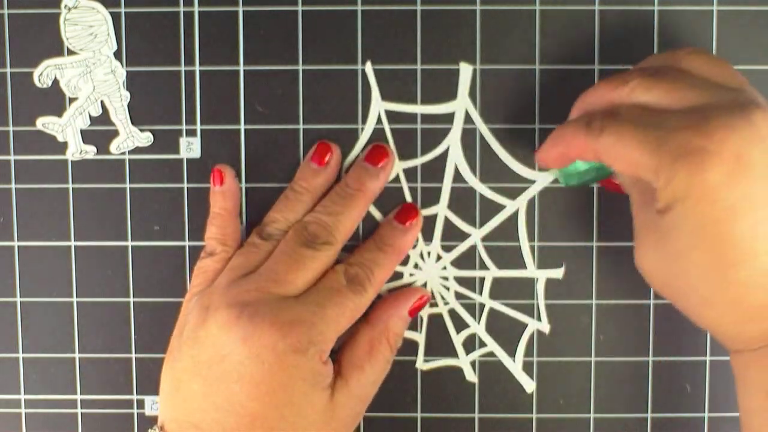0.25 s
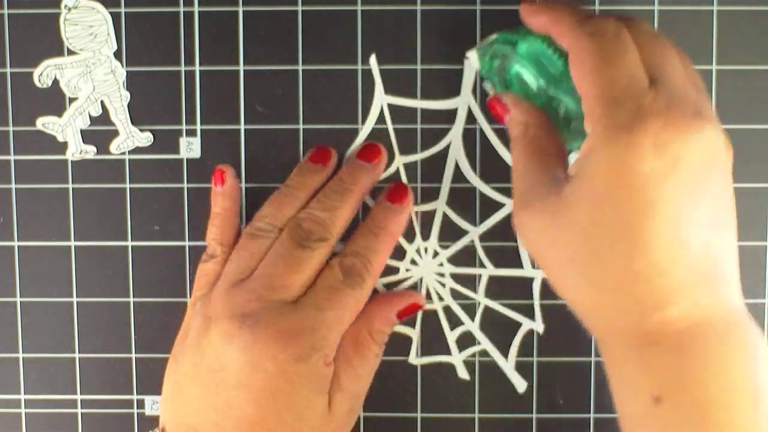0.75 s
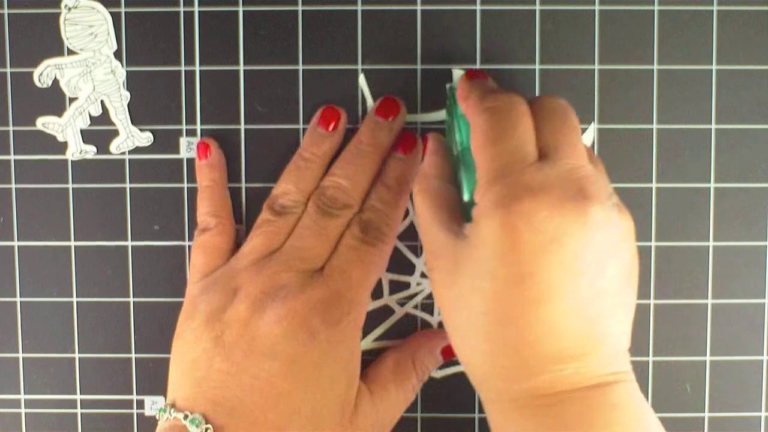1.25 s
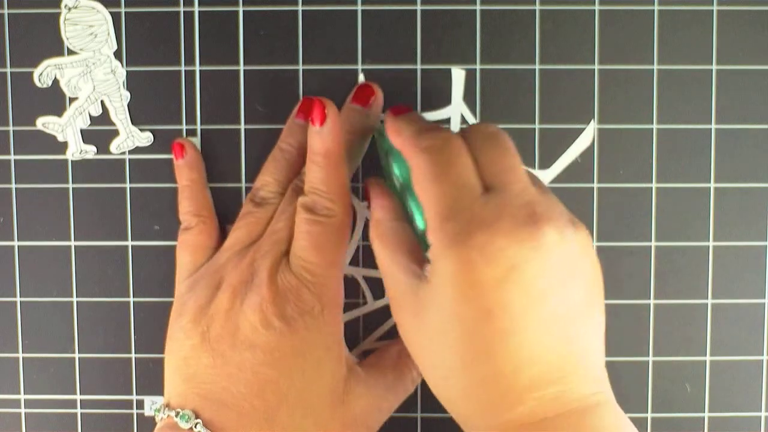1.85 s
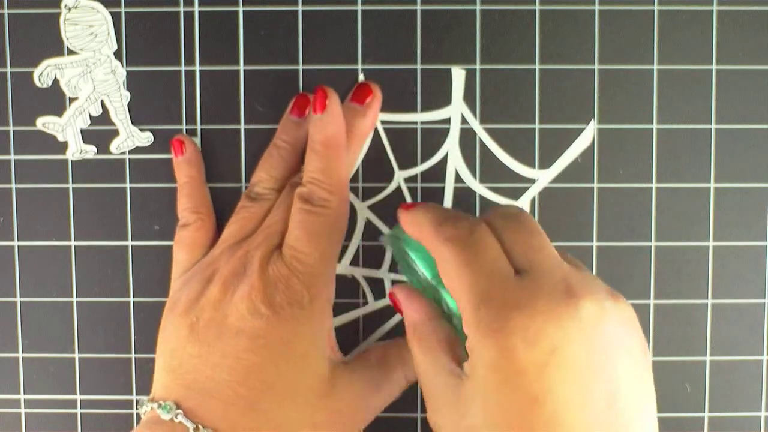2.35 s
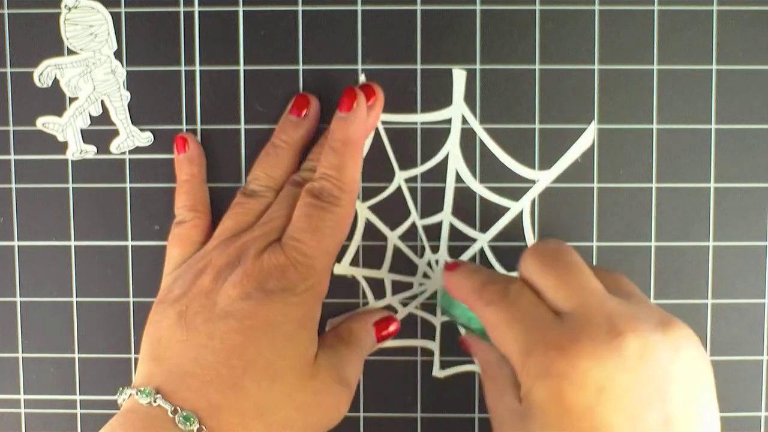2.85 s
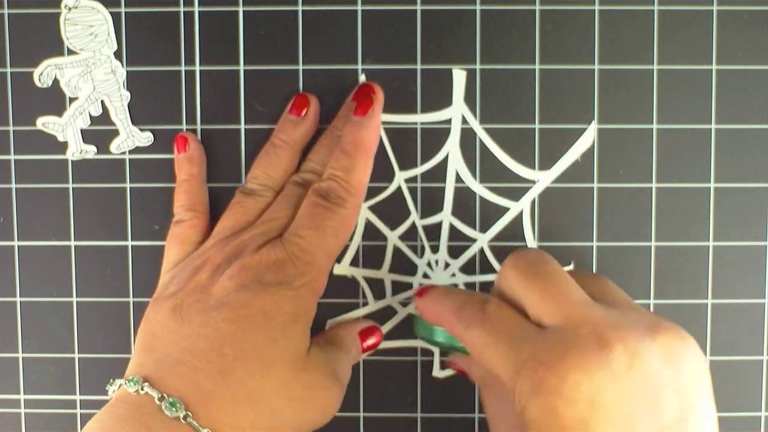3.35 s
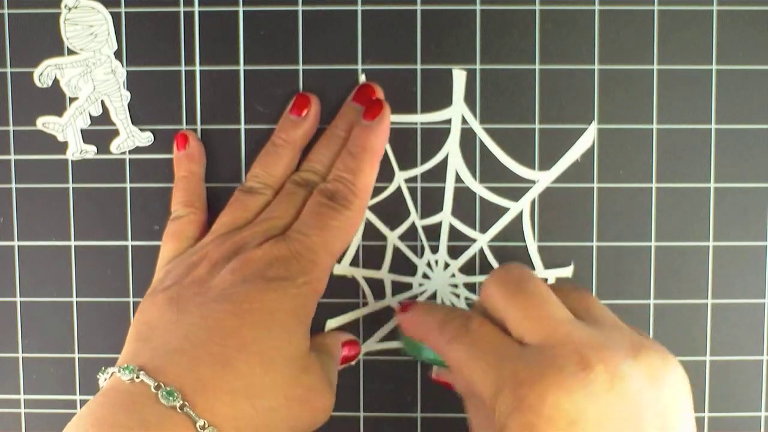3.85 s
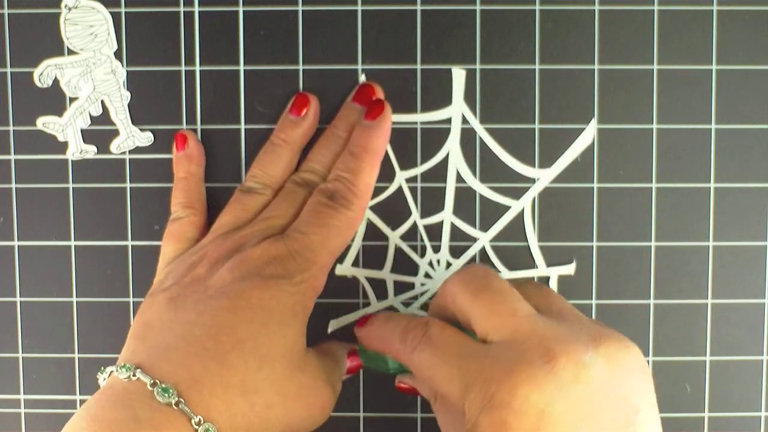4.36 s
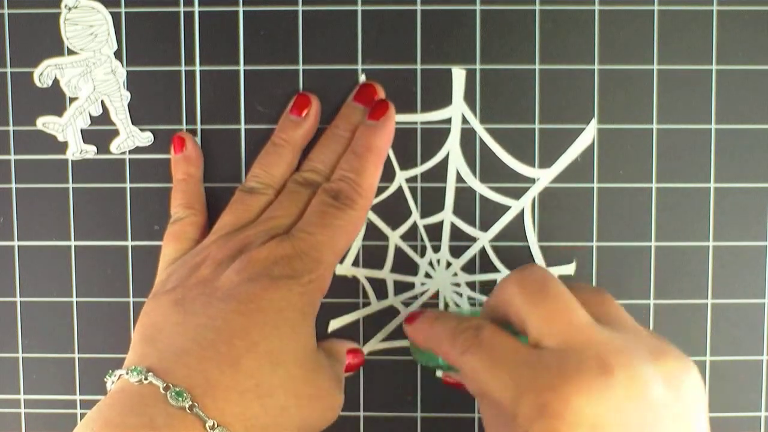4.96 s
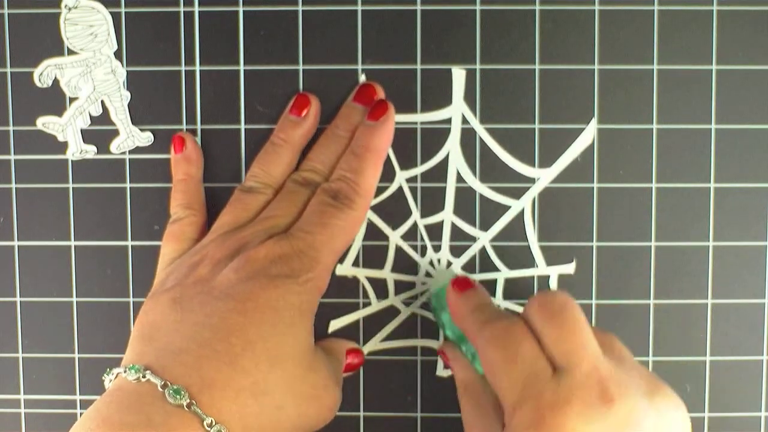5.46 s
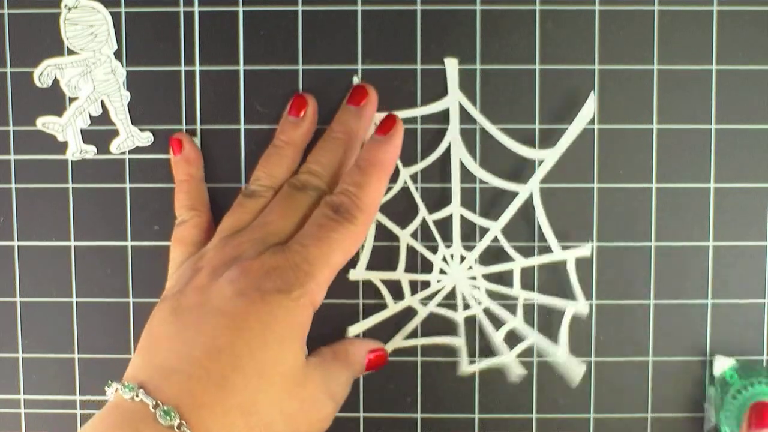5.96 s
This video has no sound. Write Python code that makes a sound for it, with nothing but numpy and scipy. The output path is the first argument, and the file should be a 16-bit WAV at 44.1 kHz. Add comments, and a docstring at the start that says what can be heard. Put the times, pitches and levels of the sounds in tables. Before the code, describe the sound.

Short dry rasps and bright plastic ratchet clicks from a tape runner pulled over a paper cut-out, with small table knocks and faint growing hiss.

```python
"""Short rasping strokes are heard first: a plastic tape runner is drawn over a paper cut-out on a craft mat.
Gear-pulsed noise, the crackle of peeling tape, excites resonances of case, hub and spools; a ratchet clicks.
Knocks are damped table modes, snaps and ticks are decaying noise bursts, and brushing is uneven filtered noise.
At the end the runner is set down and slid aside. A faint hiss lies behind and grows louder halfway through."""
import sys
import numpy as np
from scipy import signal
from scipy.fft import rfft, irfft
from scipy.io import wavfile
from scipy.ndimage import uniform_filter1d, map_coordinates

SR = 44100
rng = np.random.default_rng(int(sys.argv[2]) if len(sys.argv) > 2 else 0)


def wav_record(signal):
    """Record a signal, one row per channel, as 16-bit PCM in the file named by sys.argv[1]."""
    frames = np.transpose(np.atleast_2d(signal))
    bounded = np.clip(frames, -1, 1)
    # unit amplitude maps onto the largest positive 16-bit level
    quanta = np.round(bounded * 32767).astype(np.int16)
    wavfile.write(sys.argv[1], SR, quanta)


N = 273861
T = np.arange(N) / SR  # time in s

# background hiss over time: time_s, level_db
HISS_LEVEL = [(0, -66.5), (.5, -70.5), (2.55, -68), (2.9, -60), (3.1, -59), (3.35, -55), (4.9, -53.5),
              (6.21, -53)]
# spectrum of the hiss: frequency_hz, gain_db
HISS_SPECTRUM = [(30, -45), (80, -16), (150, -14), (220, -7.5), (400, -3.5), (750, 3), (1350, -0.5),
                 (2000, -3), (4200, -8.5), (8700, -11), (9600, -13), (10400, -29.5), (13000, -72)]
# slow swells of the recorder's zero line, too deep to hear: start_s, relative_peak_db
ZERO_LINE_SWELLS = [(.512, -42.5), (1.153, -41.5), (1.954, -41)]
# fingers and case brushing over paper and mat:
# start_s, length_s, relative_level_db, swell_from_start_to_crest_db, crest_as_share_of_length
BRUSHES = [(0.72, 0.11, -66.5, 9, 0.92), (1.092, 0.29, -70, -3, 0.38), (1.73, 0.016, -66.5, 11, 0.54),
           (1.837, 0.075, -64.5, 12, 0.57), (2.192, 0.034, -47, 23, 0.12), (2.425, 0.02, -68, 2, .2),
           (3.282, 0.029, -51.5, -1, .6), (5.076, 0.17, -45, 17, 0.046), (5.974, 0.24, -38, 9, 0.46)]
# spectrum of the brushing: frequency_hz, gain_db
BRUSH_SPECTRUM = [(50, -23), (150, -59), (400, -12.5), (700, 1.5), (1200, 3), (2000, -7), (3300, -2.5),
                  (4300, -8.5), (6300, -1), (10000, -19)]
# the nose meets the table: start_s, relative_peak_db, brightest_hz, low_thud_db
KNOCKS = [(0.243, -52, 1370, 2), (1.522, -50.5, 1300, -1), (3.099, -44.5, 720, 6), (3.577, -32, 1352, -6.5),
          (3.811, -41, 1430, 2), (4.07, -49, 890, 2), (4.455, -37.5, 624, -3.5), (4.618, -36, 1400, -16),
          (4.754, -41.5, 1337, -11), (4.9905, -26.5, 635, 1), (5.001, -33, 1340, -4),
          (5.382, -29.5, 626, 0.5), (5.39, -32.5, 1310, -22), (5.963, -27, 1160, -8.5)]
# damped modes of the table under the mat, before the thud spectrum: frequency_hz, level_db
TABLE_MODES = [(220, 13), (335, 13), (520, -26), (620, -10), (720, -37.5), (980, -1), (1345, 6), (1830, 12),
               (2100, 57), (2830, 44)]
# spectrum of the knocks: frequency_hz, gain_db
THUD_SPECTRUM = [(50, -24), (130, -20), (210, -2.5), (265, -3.5), (335, 7.5), (420, 0.5), (580, 8.5),
                 (1400, -1.5), (2800, -18.5), (4000, -9), (9000, -36)]
# single snaps of the case and some loud ratchet ticks: start_s, peak_db, brightest_hz, hollow_body_db
CLICKS = [(0.2448, -46.5, 7570, -7.5), (0.2842, -42, 7450, -26), (1.219, -55.5, 6500, 0),
          (1.877, -66, 3470, -9), (1.9246, -52, 3100, -3), (1.9658, -40.5, 8400, -13),
          (2.1243, -45, 5440, -6), (2.1612, -42.5, 5330, 0), (2.196, -48, 6300, -16),
          (2.604, -55.5, 3180, -4), (2.6739, -39.5, 5140, -7), (2.939, -57, 6500, -8),
          (3.1072, -47.5, 5900, -5), (3.2055, -30.5, 6220, -14), (3.2409, -26, 8100, -12),
          (3.578, -35.5, 2850, 1), (3.7267, -40, 4200, -6), (3.8124, -38, 8230, -3),
          (4.072, -52.5, 9050, -9), (4.127, -51, 9050, -8), (4.454, -31, 4450, -16),
          (4.464, -32, 4200, -11), (4.6124, -42, 6430, -6), (4.6393, -28, 4370, -29),
          (4.9905, -36.5, 5380, -12), (4.9962, -35, 2920, -9), (5.383, -37, 3030, -2),
          (5.4078, -26, 7600, -9.5), (5.7498, -33.5, 3050, 1.5), (5.7824, -25.5, 7900, -9),
          (5.8106, -28, 8230, -33), (5.9634, -26, 5290, -1), (5.9973, -27.5, 5530, -11),
          (6.062, -42, 3210, -27), (6.113, -32, 3730, 0), (6.187, -32, 6510, -1)]
# spectrum of a snap or tick: frequency_hz, gain_db
CLICK_SPECTRUM = [(50, 7), (150, -22), (500, 0.5), (1200, 3), (3300, 7.5), (5500, 24), (8300, 19.5),
                  (9600, 17.5), (10500, -1)]
# ringing of the plastic case: frequency_hz, width_hz, level_db
CASE_MODES = [(2990, 30, -4), (3284, 160, 1), (5173, 34, -0.5), (5710, 100, -0.5), (6180, 190, -12),
              (6730, 99, -12), (7520, 130, 2.5), (8120, 100, 10), (8800, 340, 2)]
# hollow of the case: frequency_hz, width_hz, level_db
SHELL_MODES = [(1833, 170, 3.5), (2100, 160, 9), (2880, 180, 6), (3310, 207, 10)]
# pulls of the runner: start_s, length_s, rasp_db, relative_spool_whirr_db, swell_from_start_to_crest_db,
# crest_as_share_of_length, ratchet_ticks_per_s_at_crest, tick_over_rasp_db
STROKES = [(0.0, 0.077, -48.5, -54.5, 6, 0.083, 91, -4), (0.283, 0.063, -49, -57, 2, .65, 70, -12),
           (1.318, 0.12, -51, -58, 2, 0.96, 63, 0.5), (1.454, 0.06, -46, -47.5, 8.5, 0.41, 48, 3),
           (2.057, 0.093, -48.5, -49.5, 2, .7, 53, -3), (2.649, 0.029, -45, -48, 6.5, 1, 110, -2),
           (2.712, 0.031, -54.5, -62, 4, 0.24, 80, -3), (2.773, 0.067, -42.5, -49, 1, 0.81, 91, -0.5),
           (3.181, 0.04, -37.5, -49, 0, 0.39, 77, 6), (3.251, 0.029, -50.5, -69, -1, .2, 48, -8),
           (3.626, 0.093, -54, -60, -2.5, 0.6, 20, 11), (3.729, 0.072, -40.5, -63, 14, 0.8, 41, -1),
           (4.59, 0.14, -34, -37, 11.5, .52, 89, 6), (5.05, 0.04, -36.5, -38, 6.5, 0.33, 85, -9),
           (5.426, 0.099, -39.5, -47, 4.5, 0.76, 74, -1.5), (5.5, 0.052, -32.5, -32, 11, .6, 110, -12),
           (6.075, 0.021, -31, -40, 4.5, 0.44, 68, 1)]
# spectrum of the rasp: frequency_hz, gain_db
RASP_SPECTRUM = [(50, -45), (150, -26), (400, -16), (700, -3.5), (1200, 1), (2300, -5.5), (3200, 0),
                 (3900, -5.5), (5300, 7), (7000, 5), (8600, -1), (9700, 1.5), (10500, -15.5)]
# resonances of the spool hub: frequency_hz, width_hz, level_db
HUB_MODES = [(4233, 30, -11.5), (4400, 61, -1), (4470, 50, -29)]
# resonances of the spools: frequency_hz, width_hz, level_db
SPOOL_MODES = [(1070, 55, -16), (1310, 92, -7), (1348, 43, 2.5), (1634, 360, -14.5), (2160, 190, -21)]

# a T60 is the time of a decay by 60 dB
BRUSH_ATTACK_S, BRUSH_RELEASE_T60_S = 0.0073, 0.053
KNOCK_T60_S, CLICK_T60_S = 0.069, 0.036
RATCHET_HZ, RATCHET_BODY_DB, RATCHET_T60_S = 5700, -13.5, 0.023
STROKE_ATTACK_S, STROKE_RELEASE_T60_S, SPOOL_RELEASE_T60_S = 0.0027, 0.081, 0.17
LEFT_DB = 2.5  # gain of left over right
TOP_HZ = 10570  # upper band limit


def undb(db):
    """Logarithmic level: decibels become an amplitude factor."""
    return 10 ** (np.asarray(db) / 20)


def unit(x):
    """Normalisation: the root mean square becomes 1."""
    return x / np.sqrt(np.mean(x ** 2))


def noise():
    """White noise: equal mean power at every frequency, as long as the scene."""
    return rng.standard_normal(N)


def wander(size):
    """Random modulation: noise smoothed twice over size samples, scaled to rms 1."""
    once = uniform_filter1d(noise(), size=size)
    return unit(uniform_filter1d(once, size=size))


def colour(x, points):
    """Minimum-phase filtering: a causal response follows (Hz, dB) points."""
    hz, db = np.transpose(points)
    grid = np.maximum(np.fft.rfftfreq(2048, 1 / SR), 1)
    log_gain = np.log(undb(np.interp(np.log(grid), np.log(hz), db)))
    cepstrum = irfft(log_gain)
    # folding the cepstrum onto positive time makes the filter causal
    half = len(cepstrum) // 2
    cepstrum[1:half] *= 2
    cepstrum[half + 1:] = 0
    response = irfft(np.exp(rfft(cepstrum)))
    return signal.fftconvolve(x, response)[:len(x)]


def band(x, hz, width_hz):
    """Damped resonance: one mode with gain 1 at its centre."""
    hz = min(hz, SR / 3)
    quality = hz / np.clip(width_hz, 30, SR / 4)
    return signal.lfilter(*signal.iirpeak(hz, quality, fs=SR), x)


def ring(x, modes):
    """Modal superposition: a body's resonances add in alternating polarity."""
    return sum((-1) ** k * undb(db) * band(x, hz, width) for k, (hz, width, db) in enumerate(modes))


def shifting_ring(x, modes, shift_db, bend_s=0.000298):
    """Moving excitation: a contact feeds modes unevenly; the gripping hand bends their pitch a little."""
    rung = sum(band(x * undb(db + shift_db * wander(size=600)), hz, width) for hz, width, db in modes)
    # a slowly varying time shift, of rms bend_s, bends the pitch
    warped_time = T + bend_s * wander(size=1800)
    return unit(map_coordinates(rung, [warped_time * SR], mode="mirror"))


def fade(t, t60):
    """Exponential damping: amplitude falls by 60 dB in t60 seconds."""
    return np.exp(-np.minimum(np.log(1000) * t / t60, 60))


def echoes(x, t60):
    """Diffuse reverberation: dense decaying reflections through a response of unit energy."""
    t = T[:SR // 2]
    tail = rng.standard_normal(len(t)) * fade(t, t60) * (t > .002)
    return signal.fftconvolve(x, tail / np.linalg.norm(tail))[:N]


def add(out, s, sound, db):
    """Superposition: a sound is placed so that its loudest 2 ms have this rms level."""
    peak = np.sqrt(uniform_filter1d(sound ** 2, size=88).max())
    start = max(int(s * SR), 0)
    out[start:start + len(sound)] += (sound * undb(db) / peak)[:N - start]


def arch(t, length, swell_db, crest):
    """Varying force: the hand's level runs straight in dB to a crest and back."""
    top = np.clip(crest, .05, .95) * length
    return undb(np.interp(t, [0, top, length], [-swell_db, 0, -swell_db]))


def pressure(t, length, swell_db, crest, attack_s, release_t60):
    """Amplitude envelope: one movement of the hand bites, follows its arch and dies away."""
    gain = np.zeros(N)
    moving = (t >= 0) & (t < length + 2 * release_t60)
    t = t[moving]
    attack = np.clip(t / attack_s, 0, 1)
    release = fade(np.maximum(t - length, 0), release_t60)
    gain[moving] = attack * arch(t, length, swell_db, crest) * release
    return gain


def hiss():
    """Broadband noise: a smooth coloured background whose level varies slowly."""
    s, db = np.transpose(HISS_LEVEL)
    return unit(colour(noise(), HISS_SPECTRUM)) * undb(np.interp(T, s, db))


def zero_line(rest_db=-50, gain_db=-2, unsteady_db=-29):
    """Slow offset: the recorder's zero line swells three times, slightly and inaudibly unsteady, then drops to 0."""
    t = T[:SR]
    offset = undb(rest_db) * np.interp(T, [2.47, 2.5], [1, 0])
    for s, db in ZERO_LINE_SWELLS:
        swell = (1 - np.exp(-(t / .022) ** 2)) * fade(t, .55)
        add(offset, s, swell, db + gain_db)
    unsteadiness = unit(band(wander(size=260), 28, 86))
    return offset * (1 + undb(unsteady_db) * unsteadiness)


def brushes(gain_db=-1):
    """Stick-slip friction: light, uneven contact over paper and mat makes fluctuating noise."""
    grip = undb(3 * wander(size=120))
    touch = sum(undb(db) * pressure(T - s, length, swell_db, crest, BRUSH_ATTACK_S, BRUSH_RELEASE_T60_S)
                for s, length, db, swell_db, crest in BRUSHES)
    return undb(gain_db) * unit(colour(grip * noise(), BRUSH_SPECTRUM)) * touch


def knocks(tail_db=-24, gain_db=-1):
    """Impact: the nose lands on the mat in damped swings, with a dull thud and a short ring of the table."""
    out, t = np.zeros(N), T[:SR // 4]
    for s, db, hz, thud_db in KNOCKS:
        swing = np.sin(2 * np.pi * hz * t) * fade(t, KNOCK_T60_S / 2)
        decay = fade(t, KNOCK_T60_S) + undb(tail_db) * fade(t, 0.53)
        thud = colour(rng.standard_normal(len(t)) * decay, THUD_SPECTRUM)
        # every table mode decays by 60 dB in 45 cycles
        modes = sum(undb(size_db) * np.sin(2 * np.pi * (f * t + rng.random())) * fade(t, 45 / f)
                    for f, size_db in TABLE_MODES)
        tone = unit(colour(unit(swing) + unit(modes), THUD_SPECTRUM))
        add(out, s, tone + undb(thud_db) * unit(thud), db + gain_db)
    return out


def snap(hz, body_db, t60, focus=0.62, case_ring=0.36, grip_s=0.017):
    """Impulsive excitation: a decaying noise crack rings one brightest band, the case and its hollow."""
    t = T[:SR // 12]
    attack = 1 - np.exp(-t / .0002)
    crack = colour(rng.standard_normal(len(t)) * attack * fade(t, t60), CLICK_SPECTRUM)
    brightest = band(crack, hz, hz / 14)
    bright = unit(crack) + focus * unit(brightest) + case_ring * unit(ring(crack, CASE_MODES))
    hollow = undb(body_db) * unit(ring(crack, SHELL_MODES))
    # the fingers around the case damp it
    return (unit(bright) + hollow) * np.exp(-(t / grip_s) ** 2)


def clicks():
    """Impulse response: single snaps of the case and some loud ratchet ticks ring briefly."""
    out = np.zeros(N)
    for s, db, hz, body_db in CLICKS:
        add(out, s, snap(hz, body_db, CLICK_T60_S), db)
    return out


def ratchet(jitter=.04, spread=0.317, speed_law=0.39):
    """Repeated impact: a pawl ticks over its wheel, faster and harder as the force of the pull rises."""
    out = np.zeros(N)
    # sixteen ticks whose brightest pitch scatters around RATCHET_HZ
    ticks = [snap(RATCHET_HZ * np.exp(spread * c), RATCHET_BODY_DB, RATCHET_T60_S)
             for c in rng.standard_normal(size=16)]
    for s, length, db, _, swell_db, crest, rate, tick_db in STROKES:
        t = 0
        for which, late in zip(rng.permutation(len(ticks)), rng.standard_normal(len(ticks))):
            if t < length:
                press = arch(t, length, swell_db, crest)
                add(out, s + t, ticks[which], db + tick_db + 20 * np.log10(press))
                t += np.exp(jitter * late) / (rate * press ** speed_law)
    return out


def gear_teeth(rate, jitter, scatter_db, slip_s):
    """Stick-slip: each tooth catches and slips, an uneven train of short, decaying pushes."""
    gap, size = rng.standard_normal((3000, 2)).T
    times = np.cumsum(np.exp(jitter * gap) / rate)
    times -= times[0]
    last = np.searchsorted(times, T, side="right") - 1
    push = undb(scatter_db * np.clip(size[last], -2, 2))
    return unit(push * np.exp(-(T - times[last]) / slip_s))


def strokes(peel=0.54, shift_db=3, whirr_db=-1, chirp_db=-6, hard_db=-34, patchy_db=0.4, spool_swell=1.74):
    """Forced resonance: snapping glue strands crackle, pulsed by the gears; case, hub and spools ring."""
    loudness, spin = np.zeros(N), np.zeros(N)
    for s, length, db, spool_db, swell_db, crest, _, _ in STROKES:
        loudness += undb(db) * pressure(T - s, length, swell_db, crest, STROKE_ATTACK_S, STROKE_RELEASE_T60_S)
        spin += undb(spool_db) * pressure(T - s, length, spool_swell * swell_db, crest,
                                          STROKE_ATTACK_S, SPOOL_RELEASE_T60_S)
    # the glue grips unevenly
    loudness = loudness * undb(patchy_db * wander(size=260))
    # steady peeling plus the pulses of the gear teeth (per s)
    drive = peel + gear_teeth(rate=230, jitter=.5, scatter_db=-1, slip_s=0.0021)
    crackle = drive * noise() * undb(3.5 * np.clip(noise(), -2, 2))
    case = shifting_ring(crackle, CASE_MODES, shift_db)
    rasp = unit(colour(unit(crackle) + 0.65 * case, RASP_SPECTRUM))
    # the hub's chirp weakens further in strokes softer than hard_db
    hardness = np.minimum(loudness / undb(hard_db), 1)
    chirp = undb(chirp_db) * hardness * shifting_ring(crackle, HUB_MODES, shift_db)
    spools = shifting_ring(drive * noise(), SPOOL_MODES, shift_db)
    whirr = unit(band(spools, 1360, 1440))
    return (rasp + chirp) * loudness + undb(whirr_db) * whirr * spin


def scene(desk_db=-11, room_db=-23, side_db=-19):
    """Direct and reflected sound: desk and small, dry room answer close sources, a little to the left."""
    near = strokes() + ratchet() + clicks() + knocks() + brushes()
    desk = undb(desk_db) * echoes(near, t60=0.12)
    room = undb(room_db) * echoes(near, t60=0.25)
    mid = near + desk + room + hiss()
    side = undb(side_db) * echoes(mid, t60=0.033)
    return np.array([(mid + side) * undb(LEFT_DB / 2), (mid - side) * undb(-LEFT_DB / 2)])


def record(dry, low_hz=130, notch_hz=7860, notch_width_hz=70):
    """Transducer response: the microphone thins the bass, notches the treble and cuts the top steeply."""
    heard = signal.sosfilt(signal.butter(2, low_hz, "high", fs=SR, output="sos"), dry)
    heard = heard - band(heard, notch_hz, notch_width_hz)
    # the zero line is added after the bass cut
    heard = heard + zero_line()
    return signal.sosfilt(signal.ellip(8, .2, 70, TOP_HZ, fs=SR, output="sos"), heard)


dry = scene()
out = record(dry)
wav_record(out)
```